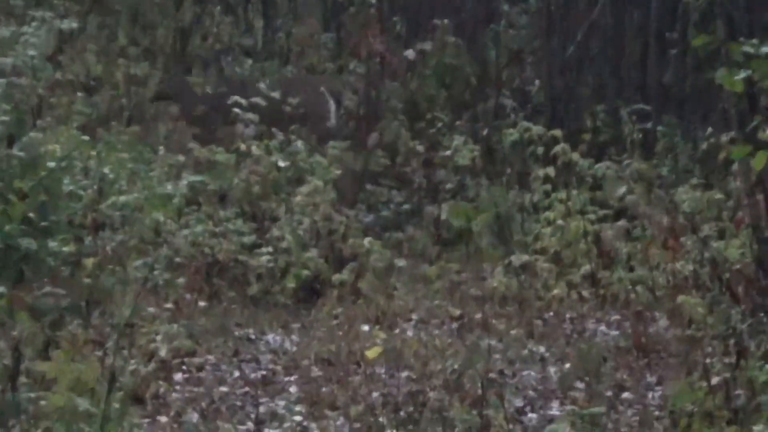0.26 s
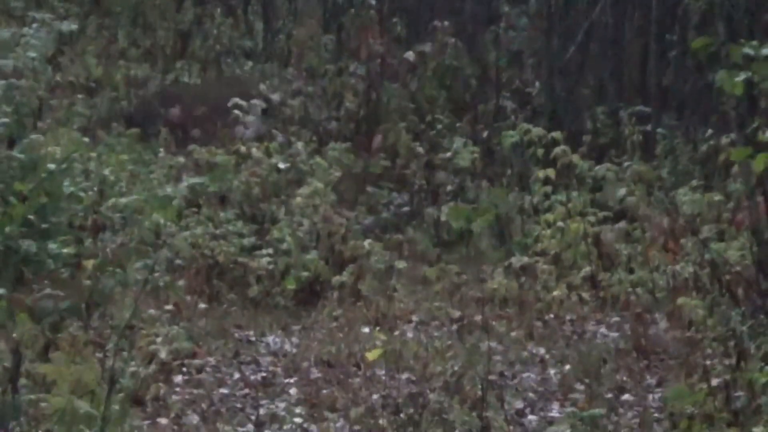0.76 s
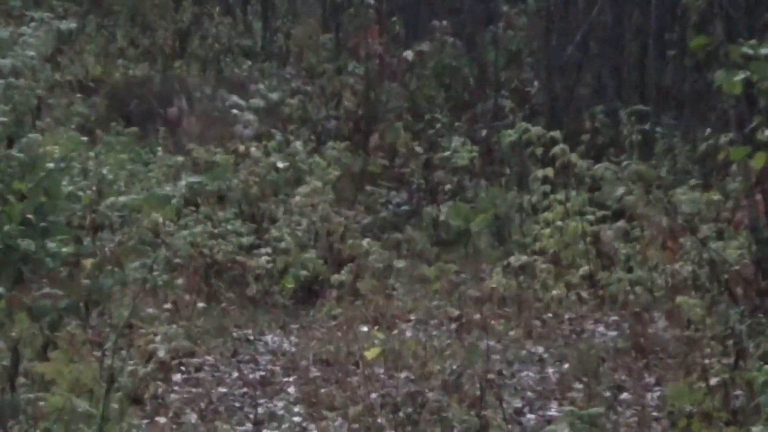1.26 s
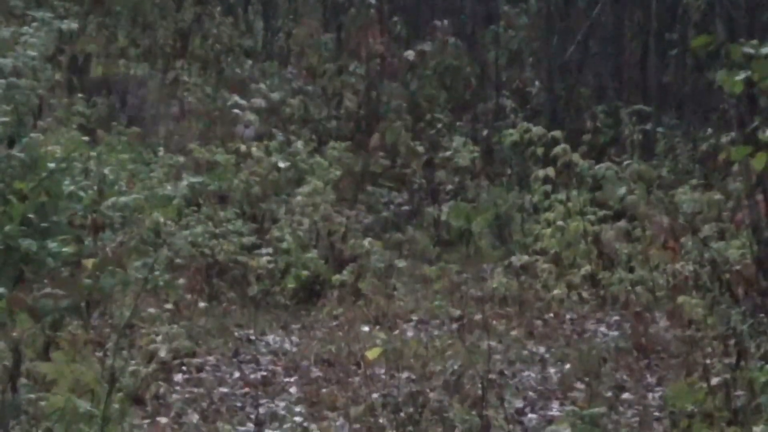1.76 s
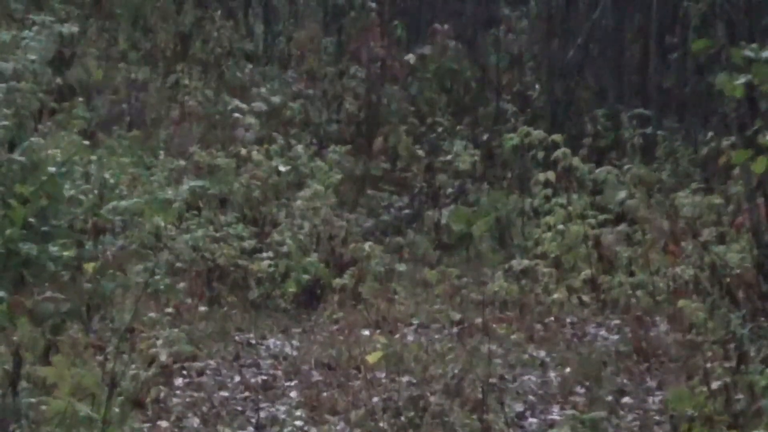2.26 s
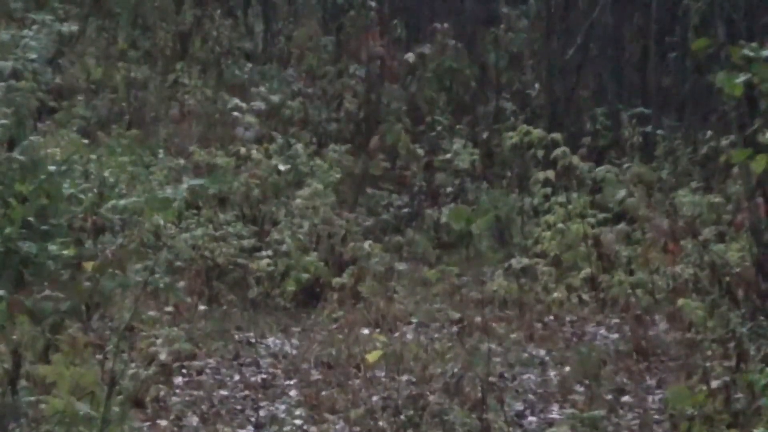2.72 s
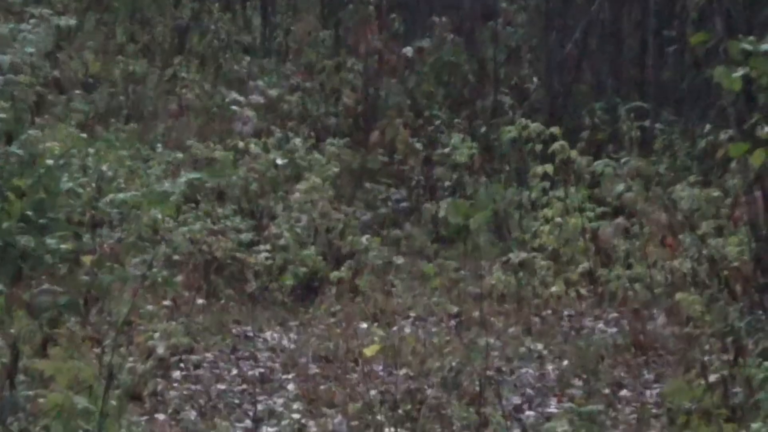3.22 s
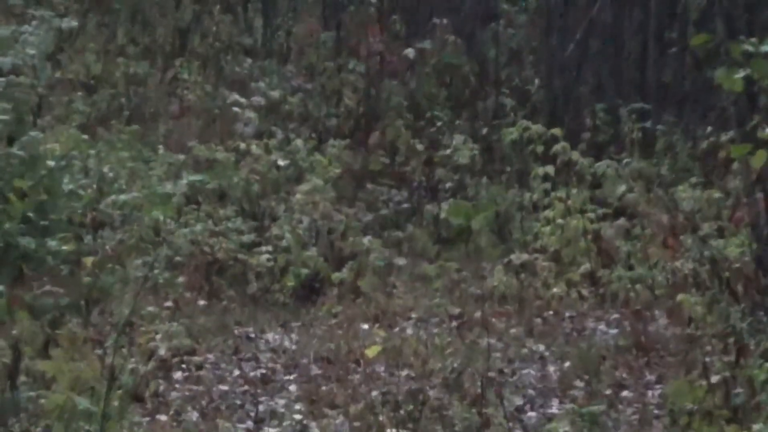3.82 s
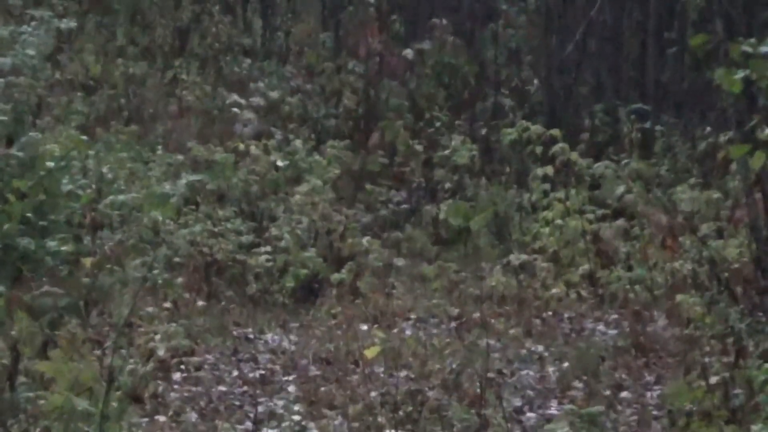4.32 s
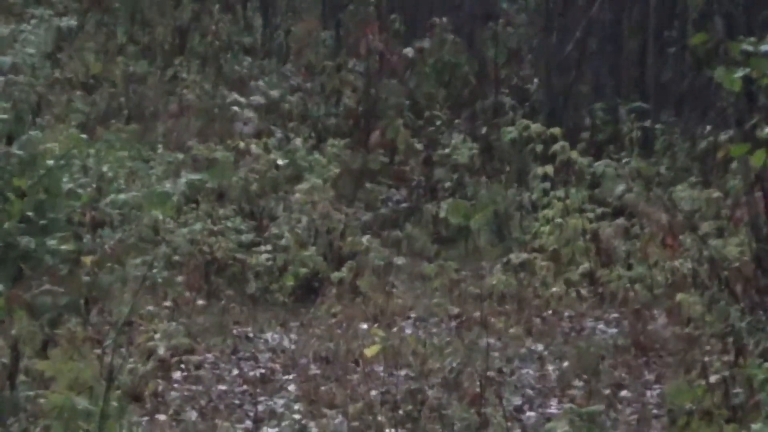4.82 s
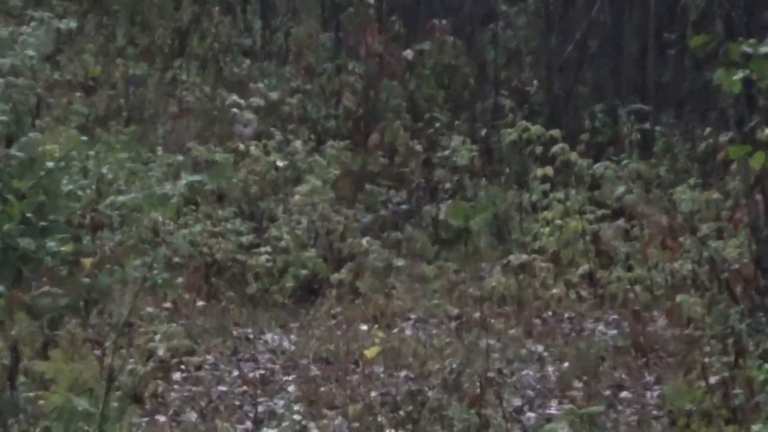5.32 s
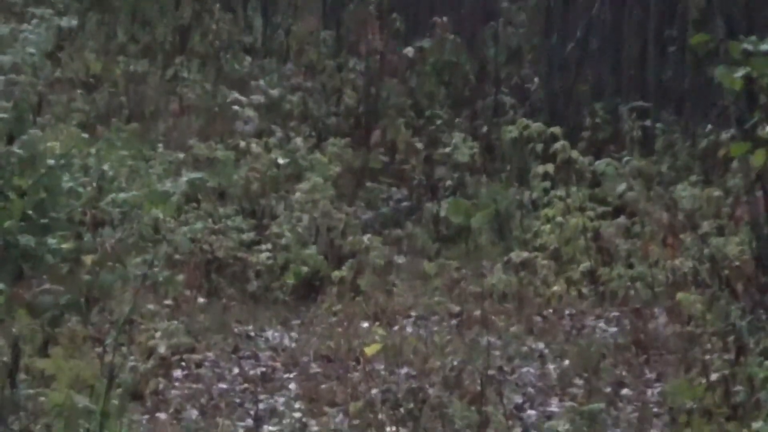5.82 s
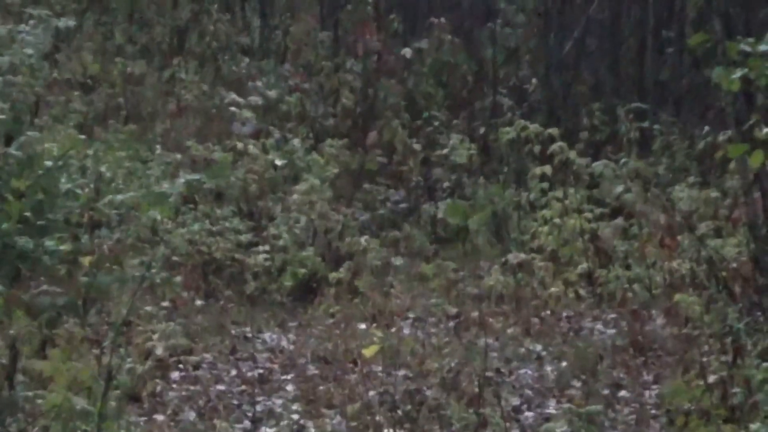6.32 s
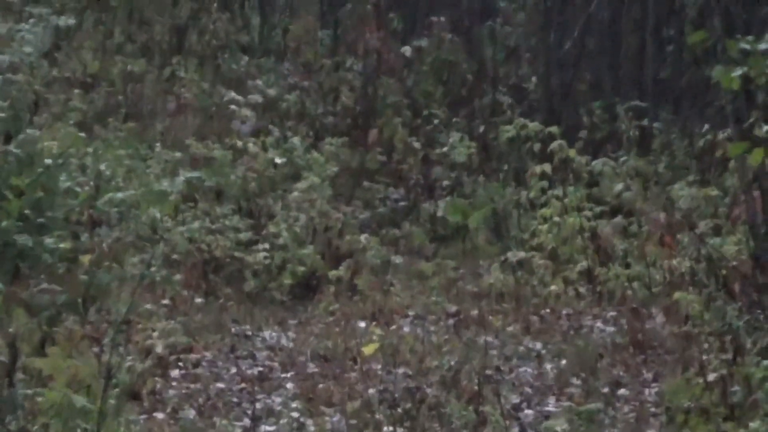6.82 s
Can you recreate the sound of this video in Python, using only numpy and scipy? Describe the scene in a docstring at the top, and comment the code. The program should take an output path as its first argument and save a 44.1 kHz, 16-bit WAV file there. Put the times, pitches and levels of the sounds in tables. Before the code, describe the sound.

Inside a small shelter, close under its roof, irregular drips strike: an opening flurry of light taps, one solid knock, a sharp click, then a sparse lull. Later come stronger clacks, a hollow clonk and tocks, then a slap and a heavy thud near the end. Each dies within a fraction of a second. Behind lie tiny leaf ticks and faint, wide, even light rain.

```python
"""Tree drips on a shelter roof

Large drops fall from trees onto the roof of a small shelter in a wood; the microphone is inside. Each drop is a
filtered crack with near-wall echoes, a decaying noise tail and two ringing modes of the roof; smaller, fainter
ones land at random, and low sine pulses thump. Outside, noise bursts tick on leaves over the faint, steady wash
of light rain, made of shaped noise."""
import sys
import numpy as np
from scipy import signal
from scipy.fft import rfft, irfft
from scipy.io import wavfile
from scipy.ndimage import uniform_filter1d

SR = 44100
rng = np.random.default_rng(int(sys.argv[2]) if len(sys.argv) > 2 else 0)


def master(y):
    """Save y as 16-bit WAV."""
    cut = np.clip(np.atleast_2d(y).T, -1, 1)
    pcm = np.round(cut * 32767)  # scale
    wavfile.write(sys.argv[1], SR, pcm.astype(np.int16))


N = 311829

# Large drops on the roof. Each row: start in seconds, name of the spot, level in dB at 1 kHz before the
# common trim, extra bass in dB, treble slope in dB per octave, crack against tail in dB.
ROOF_DROPS = [(0.1263, "tip", -3.5, 0.5, -5.3, 1), (0.181, "pat", -7, -1, -11, -15),
              (0.258, "tip", -12, -17, -5.5, -3), (0.2988, "pat", -7, -8, -5.5, -8),
              (0.3592, "tip", -3, 4, -6, -2), (0.6205, "knock", 9.5, 0.5, -3.4, -20),
              (0.692, "tap", -5.5, -1, -5, -10), (0.7339, "tip", -1, 4.5, -5.5, -1),
              (0.935, "pat", -12.5, -2, -3, -3), (1.4005, "pat", -9, -8, -8, -6),
              (1.4985, "click", 10.5, -7, 0.8, 2), (1.6279, "tip", -9.5, -5, -4, 6),
              (1.9968, "click", -6.5, 0, -4.5, -5), (2.093, "tock", -8.5, -5, -4, -8),
              (2.551, "pat", -16, 1, -2.5, 13), (2.7884, "pat", -15.5, -5, -2, 1),
              (3.305, "click", -3, -1, -6.5, -3), (3.372, "click", -8.5, 6, -4, -4),
              (3.4727, "click", -8, 0, -4.8, -2), (3.4992, "tap", 8.5, 6, 0.35, -4),
              (3.7056, "click", -8.5, 2.5, -5, -4), (3.9629, "clack", 12, 1.5, -1.27, -1.5),
              (4.389, "knock", -8.5, 4.5, -5.2, -7), (4.4265, "clonk", 8, -2, 1, 0.5),
              (4.605, "pat", -2.5, 5.5, -6, -13), (4.616, "tap", -1, 7.5, -3.9, 2.5),
              (4.7511, "tip", -11.5, -3, -3, 2), (4.855, "tip", -10.5, -10, -6.5, -6),
              (4.9398, "tock", 11.5, -7, -2, -4), (5.1531, "tap", -12, 3, -4.7, -1),
              (5.429, "plock", -1.5, 1.5, -2.5, 3.5), (5.793, "knock", 3, -1.5, -10.3, -7),
              (6.314, "knock", -5, 2, -12, -2), (6.332, "slap", 9.5, -5.5, 0.93, -5.5),
              (6.6267, "pat", -3, 5.5, -4.5, -0.5), (6.705, "tap", -4.5, 3, -4, -12),
              (6.7464, "tap", -8, 6.5, -4.5, -14), (6.775, "tip", -6.5, -1, -5.2, -5),
              (6.855, "tap", -10, -1, -4, -3), (6.8999, "thud", 12, 1, -1.2, -5),
              (7.036, "pat", -10, 4, -3, -12)]
# Spots of the roof under the dripping branches, named by sound. Each entry: main pitch in Hz, its ring in dB,
# second pitch in Hz, its ring in dB, dip in the blow's spectrum in Hz, extra knock in dB, extra snap in dB.
ROOF_SPOTS = {"tip": (785, -7.5, 310, -15, 4500, -1.5, -1), "pat": (424.5, -9, 324, -17, 4480, -1, 2),
              "tock": (767, -2.5, 253, -10.5, 4480, -3.5, -2.5),
              "knock": (544, -6.5, 306, -7, 1542, 3.5, -0.5),
              "tap": (555, -9.5, 223.5, -14.5, 4700, 0.5, 2), "click": (935, -3.5, 811, -6, 3452, -4, 1),
              "clack": (796, -0.5, 274, -9, 3180, -2, -6.5), "clonk": (455, -2, 182.5, -7.5, 1290, 2, -2.5),
              "plock": (434, -2, 657, -12, 1320, 1.5, 9), "slap": (976, -6.5, 431.5, -5, 3102, -0.5, -2),
              "thud": (337, -8.5, 206, -10, 3160, 0.5, -2)}
# Band centres of a blow in Hz: boom, body, knock, level, snap, splash and spray.
BAND_HZ = (95, 240, 500, 1020, 2400, 5300, 9000)
# Colour common to all blows, in dB against 1 kHz: boom, body, knock, snap, splash and spray.
COMMON_COLOUR_DB = (-6.5, -2.5, 3.5, 1.5, -1, -5)
# Resonances of the roof, heard in every drop. Each row: centre in Hz, width in Hz, peak in dB.
ROOF_RESONANCES = [(48.3, 4.1, 16.5), (100, 51, 5), (190, 34, 4), (269, 25, 5), (331, 24, 6.5),
                   (498, 24, 3.5), (810, 130, 1.5), (1200, 52, 1.5), (1530, 160, 1), (1780, 150, -1),
                   (2670, 1700, 1)]
# Decay of the shelter's ring. Each row: frequency in Hz, time to fall by 60 dB in seconds.
RING_T60 = [(80, 0.42), (210, 0.32), (560, 0.2), (1470, 0.13), (3880, 0.11), (9000, 0.11)]
# Growth of that ring. Each row: frequency in Hz, time constant in seconds.
RING_BUILD_UP = [(80, 0.0057), (300, 0.0039), (1000, 0.0025), (8000, 0.00053)]
# First echoes off the near walls. Each row: nominal delay in seconds, nominal level in dB.
WALL_ECHOES = [(.0007, -3), (.0014, -2.5), (.0021, -31), (.0027, -6), (.0033, -7.5), (.0045, -14)]
# Channel difference inside the shelter. Each row: frequency in Hz, side against mid in dB.
SIDE_DB = [(60, -30), (250, -24), (500, -17), (1000, -8), (2000, -5.5), (4000, -5.5), (9000, -8)]
# Soft low thumps as the roof springs back. Each row: start in seconds, peak level in dB.
ROOF_THUMPS = [(4.631, -52), (5.448, -51.5), (5.815, -47), (6.648, -52)]
# Drops on nearby leaves. Each row: start in seconds, level in dB before the common trim, centre in Hz.
LEAF_TICKS = [(0.161, -13, 4300), (0.8211, -21, 6940), (0.922, -15, 3960), (1.607, -7, 3520),
              (1.8513, -18.5, 6500), (2.4637, -15.5, 3800), (2.627, -19.5, 6630), (4.0295, -11.5, 4470),
              (5.7878, -7, 2980), (6.2333, -12.5, 2700)]
# Relative spectrum of light rain in the wood. Each row: frequency in Hz, density in dB per Hz.
RAIN_SPECTRUM = [(20, -9), (40, -9), (60, -16), (100, -9), (140, -10), (185, -3.5), (240, -6), (330, -4),
                 (520, -5), (1000, -5), (2500, -5), (5000, -7), (8800, -11), (11000, -19)]
# Likeness of the rain's channels. Each row: frequency in Hz, correlation from 0 to 1.
RAIN_CORRELATION = [(60, 0.83), (170, 0.88), (490, 0.64), (1380, 0.66), (3940, 0.72), (11200, 0.68)]

EDGE_HZ = 11080  # upper edge of the recorder's band
THUMP_HZ = 96.3
SWING = 0.44  # heavy drops set the whole roof swinging: dB of deep bass per dB of level


def gain_of(db):
    """Decibels are twenty times the logarithm of an amplitude ratio; this inverts them."""
    return 10 ** (np.asarray(db) / 20)


def evened(x):
    """Mean power is the square of the rms: scales a signal to rms 1."""
    return x / np.sqrt(np.mean(x ** 2) + 1e-20)


def unit(x):
    """Energy is the sum of squares: scales a signal to energy 1."""
    return x / np.sqrt(np.sum(x ** 2) + 1e-20)


def read(points, hz):
    """Pitch is logarithmic: interpolates (Hz, value) points on a log-frequency axis."""
    f, value = np.transpose(points)
    return np.interp(np.log(hz + 1), np.log(f + 1), value)


def add(mix, s, sound):
    """Superposition: sounds add linearly, here from time s in seconds."""
    part = mix[:, max(round(s * SR), 0):][:, :sound.shape[-1]]
    part += sound[..., :part.shape[1]]


def causal(db):
    """Minimum phase: a folded cepstrum gives these gains with no sound before the blow."""
    cepstrum = irfft(np.log(gain_of(db)))
    half = len(cepstrum) // 2
    cepstrum[1:half] *= 2
    cepstrum[half + 1:] = 0
    return np.exp(rfft(cepstrum))


def wash(level_db=-52):
    """Incoherent superposition: countless distant drops blend into a hiss with faint, quickly changing patches."""
    window, hop = 2048, 512  # samples
    frames, hz = N // hop + 6, np.fft.rfftfreq(window, 1 / SR)
    a, b, c, d, patches = rng.standard_normal((5, frames, len(hz)))
    patches = uniform_filter1d(patches, size=3, axis=0)  # along time
    patches = uniform_filter1d(patches, size=40, axis=1)  # along frequency
    patches_db = 0.6 * evened(patches)

    same = np.clip(read(RAIN_CORRELATION, hz), -1, 1)
    left, independent = a + 1j * b, c + 1j * d
    right = same * left + np.sqrt(1 - same ** 2) * independent
    spectrum = np.array([left, right]) * gain_of(read(RAIN_SPECTRUM, hz) + patches_db)
    spectrum = spectrum * (hz < 1.05 * EDGE_HZ)
    _, hiss = signal.istft(spectrum.transpose(0, 2, 1), nperseg=window, noverlap=window - hop)
    return gain_of(level_db) * evened(hiss[:, :N])


def drop_colour(bass_db, slope_db, knock_db=0, snap_db=0):
    """Impact spectrum: pushing the roof further adds bass, bursting slowly loses treble; spots add knock and snap."""
    octaves = np.log2(np.array(BAND_HZ[-3:]) / BAND_HZ[3])  # above the level band
    snap, splash, spray = slope_db * octaves
    return np.array(COMMON_COLOUR_DB) + [bass_db, bass_db, knock_db, snap + snap_db, splash, spray]


def blow_colour(hz, colour, null_hz, swing_db, sub_db=-11, top_db=-8, null_db=-9):
    """Source and resonator: a broad tilt, a dip set by the time of contact, and the roof's resonances, in dB."""
    colour = np.insert(colour, len(colour) // 2, 0)  # the middle band, 1 kHz, is the reference
    lowest = (55, colour[0] + sub_db + swing_db)
    highest = (EDGE_HZ, colour[-1] + top_db)
    tilt = read([lowest, *zip(BAND_HZ, colour), highest], hz)
    octaves = np.log2((hz + 1) / null_hz)
    dip = null_db * np.exp(-(octaves / 0.12) ** 2 / 2)
    resonances = sum(peak / (1 + (2 * (hz - f) / width) ** 2) for f, width, peak in ROOF_RESONANCES)
    return tilt + dip + resonances


def crack(hz, spread=0.1636, skew=0.000012, lean_db=3.0, corner_hz=900, smear=0.00018,
          wall_smear=0.1645, dull_hz=5000, clear=0.0017):
    """Early reflections: a sharp first pulse and its near-wall echoes, each from its own direction.

    The skew, smear and clear settings are in seconds; spread and wall_smear are fractions of the delay.
    """
    delay, db = np.transpose([(0.00031, 0)] + WALL_ECHOES)
    shift, angle, lean, sign = rng.uniform(-1, 1, (4, len(delay)))
    ear = np.array([[1], [-1]])
    arrival = delay * (1 + spread * shift) + ear * skew * angle * (delay > 0)
    # in a sheet the treble runs ahead of the bass, and later paths are smeared more
    lag = (smear + wall_smear * delay)[:, None] * (1 - hz / (2 * EDGE_HZ))
    # the earliest sound comes from overhead, off the microphone's axis, and is duller
    earliness = np.exp(-(delay[:, None] / clear) ** 2)
    dulling = 1 / np.sqrt(1 + (hz / dull_hz) ** 4 * earliness)
    height = (np.sign(sign) * gain_of(db + ear * lean_db * lean))[..., None] * dulling
    height = height / np.sqrt((height ** 2).sum(1).mean(0))
    pulses = (height * np.exp(-2j * np.pi * hz * (arrival[..., None] + lag))).sum(1)
    highpass = 1j * hz / (corner_hz + 1j * hz)
    return pulses * highpass


def shelter_tail(hz, t, count=14):
    """Reverberation: dense echoes, flat in spectrum; treble comes and goes fast, bass builds up and lingers."""
    edges = np.r_[0, np.geomspace(70, 12000, count)]
    noise = rfft(rng.standard_normal((2, len(t))))
    tail = np.zeros((2, len(t)))
    for lo, hi in zip(edges, edges[1:]):
        centre = (lo + hi) / 2
        growth = 1 - np.exp(-t / read(RING_BUILD_UP, centre))
        decay = np.exp(-np.log(1000) * t / read(RING_T60, centre))
        mid, side = irfft(noise * ((hz >= lo) & (hz < hi))) * (growth * decay)
        side = gain_of(read(SIDE_DB, centre)) * unit(side)
        bandwidth_gain = np.sqrt(2 * (hi - lo) / SR)
        tail += bandwidth_gain * (unit(mid) + np.array([side, -side]))
    return rfft(tail)


def patch_ring(hz, t, t60=0.13, pitch_hz=500, damping=1.0, rise=0.0021):
    """Damped vibration: one mode of the struck patch, with t60 in seconds at pitch_hz; higher modes die sooner."""
    life = t60 * (pitch_hz / hz) ** damping
    envelope = (1 - np.exp(-t / rise)) * np.exp(-np.log(1000) * t / life)
    return unit(np.sin(2 * np.pi * hz * t) * envelope)


def roof_drop(level, colour, modes, crack_db, null_hz, size=12288, bright_db=1.0, hollow_hz=1200):
    """Impact excitation: crack and echoes take the colour of the blow, and the struck patch rings on."""
    hz, t = np.fft.rfftfreq(size, 1 / SR), np.arange(size) / SR
    db = level + blow_colour(hz, colour, null_hz, SWING * level)
    # the treble arrives more directly
    direct = gain_of(crack_db + read([(1500, 0), (8000, bright_db)], hz))
    # crack and tail share the blow's energy; 900 Hz is the crack's highpass corner
    share = 1 + direct ** 2 * hz ** 2 / (hz ** 2 + 900 ** 2)
    blow = causal(db - 10 * np.log10(share))
    spectrum = blow * (direct * crack(hz) + shelter_tail(hz, t))
    # the low part of the blow drives the modes
    hollow = np.linalg.norm(irfft(spectrum.mean(0) * (hz < hollow_hz)))
    ring = hollow * sum(gain_of(ring_db) * patch_ring(ring_hz, t) for ring_hz, ring_db in modes)
    fade = np.minimum(1, (t[-1] - t) / (t[-1] / 10))
    return (irfft(spectrum) + ring) * fade


def roof(trim_db=-1):
    """Local modes: each large drop rings the spot that it lands on."""
    out = np.zeros((2, N))
    for s, spot, level, bass_db, slope_db, crack_db in ROOF_DROPS:
        main_hz, main_db, second_hz, second_db, null_hz, knock_db, snap_db = ROOF_SPOTS[spot]
        modes = [(main_hz, main_db), (second_hz, second_db)]
        colour = drop_colour(bass_db, slope_db, knock_db, snap_db)
        add(out, s, roof_drop(level + trim_db, colour, modes, crack_db, null_hz))
    return out


def droplets(count=36, level_db=-17, spread_db=5, bass_db=4, slope_db=0.0, low_hz=250, range_hz=550,
             ring_db=-10):
    """Random impacts: small, fainter drops land on the roof at independent times, each ringing one mode."""
    out = np.zeros((2, N))
    colour = drop_colour(bass_db, slope_db)
    for when, size, pitch in rng.random((count, 3)):
        modes = [(low_hz + range_hz * pitch, ring_db)]
        drop = roof_drop(level_db - spread_db * size, colour, modes, crack_db=-0.5, null_hz=4500)
        add(out, when * N / SR, drop)
    return out


def leaf_tick(db, centre_hz, octaves=0.44, decay=0.0046, side_db=-8, size=2048):
    """Band-limited noise burst: a drop sprays for milliseconds (decay in seconds) around its leaf's own pitch."""
    hz, t = np.fft.rfftfreq(size, 1 / SR), np.arange(size) / SR
    mid, side = rng.standard_normal((2, size)) * np.exp(-t / decay)
    side = gain_of(side_db) * unit(side)
    colour = db - 10 * np.log10(1 + (np.log2((hz + 1) / centre_hz) / octaves) ** 4)
    return irfft(causal(colour) * rfft(unit(mid) + np.array([side, -side])))


def leaves(count=260, near_db=-3, far_db=-24, spread_db=12, low_hz=1800, high_hz=7500):
    """Spatial distribution: a few near ticks, and a patter of many far ones, most of them faint."""
    out = np.zeros((2, N))
    for s, db, hz in LEAF_TICKS:
        add(out, s, leaf_tick(db + near_db, hz, decay=0.005))
    for when, area, pitch in rng.random((count, 3)):
        db = far_db - spread_db * np.sqrt(area)  # drops fall evenly over the ground, so few are close
        centre_hz = low_hz * (high_hz / low_hz) ** pitch
        add(out, when * N / SR, leaf_tick(db, centre_hz, decay=0.0012))
    return out


def thumps(length=0.083):
    """Low-frequency oscillation: the roof swings a few slow cycles under a smooth swell (length in seconds)."""
    out, t = np.zeros((2, N)), np.arange(0, length, 1 / SR)
    swing = np.sin(2 * np.pi * THUMP_HZ * t) * np.hanning(len(t))
    for s, db in ROOF_THUMPS:
        add(out, s, gain_of(db) * swing)
    return out


def scene():
    """Linear superposition: the roof overhead, the wood all around."""
    return wash() + roof() + droplets() + leaves() + thumps()


def record(dry):
    """Band limitation: a linear-phase lowpass sets the recorder's upper edge."""
    lowpass = signal.firwin(401, EDGE_HZ, window=("kaiser", 8), fs=SR)
    return signal.oaconvolve(dry, lowpass[None], "same")


dry = scene()
out = record(dry)
master(out)
```